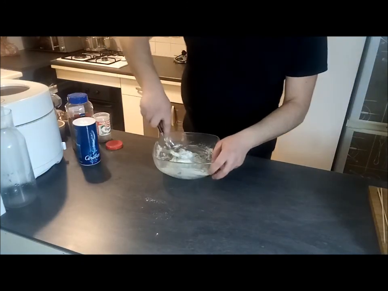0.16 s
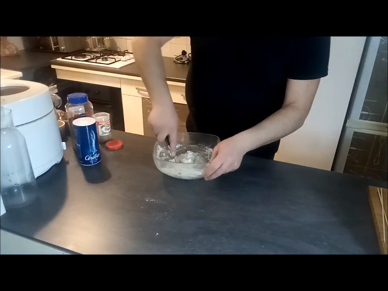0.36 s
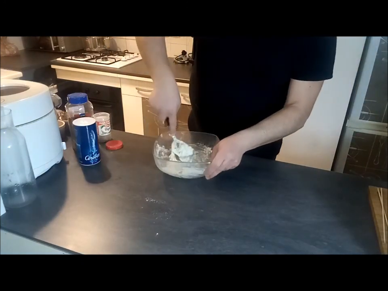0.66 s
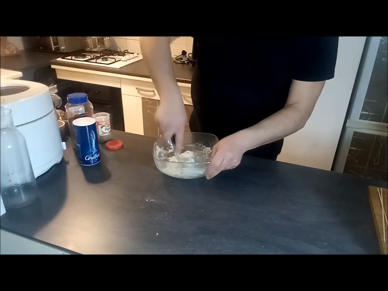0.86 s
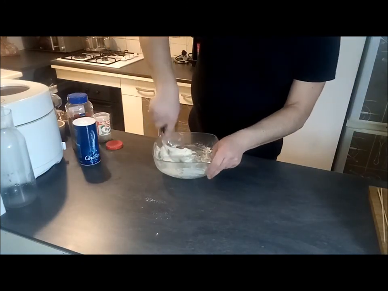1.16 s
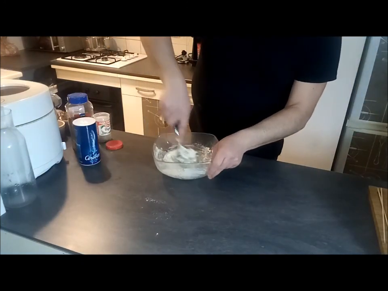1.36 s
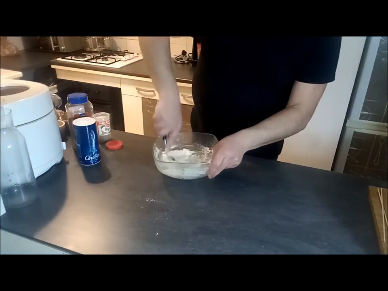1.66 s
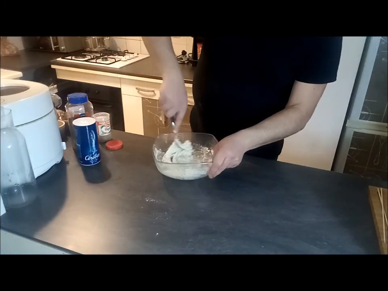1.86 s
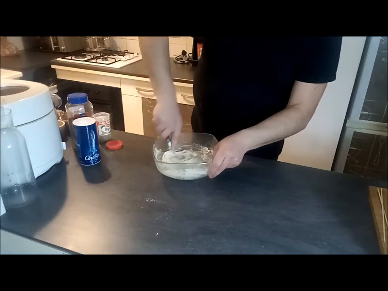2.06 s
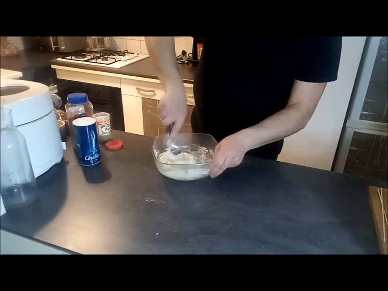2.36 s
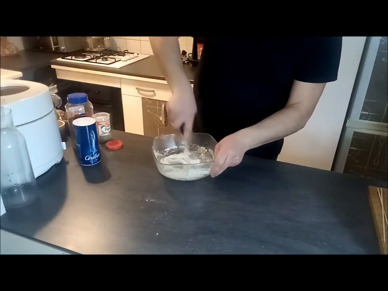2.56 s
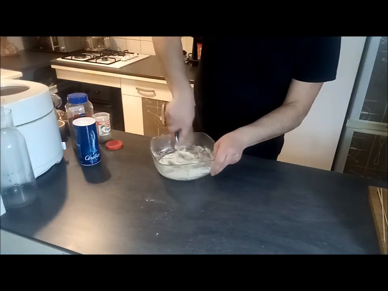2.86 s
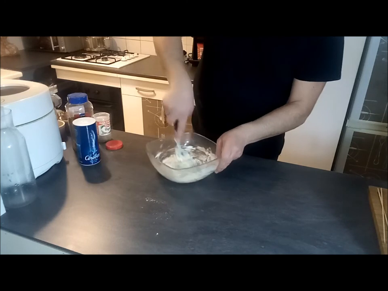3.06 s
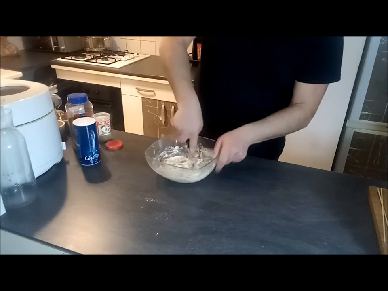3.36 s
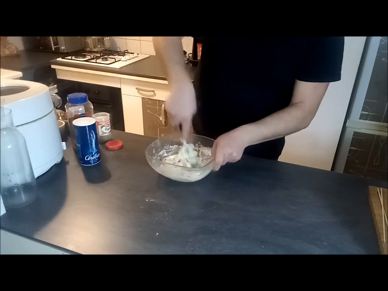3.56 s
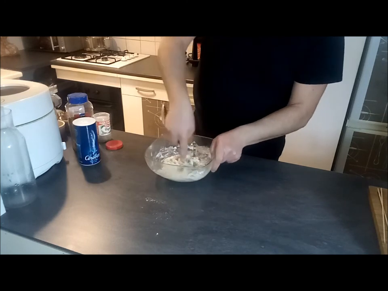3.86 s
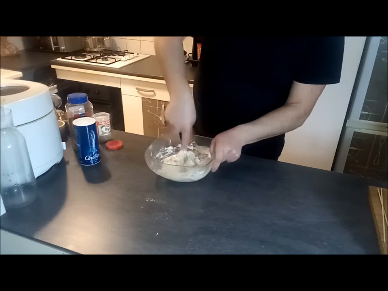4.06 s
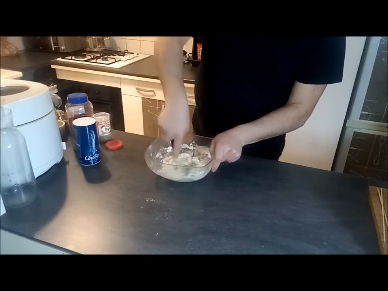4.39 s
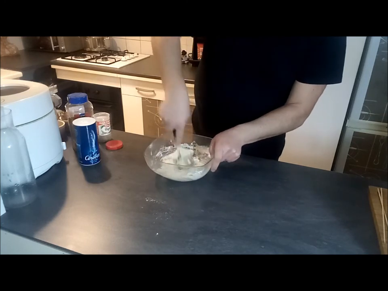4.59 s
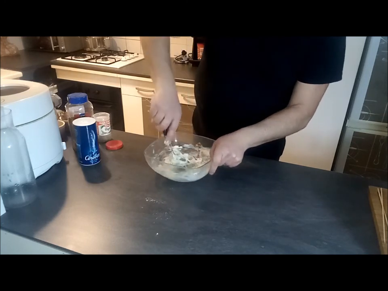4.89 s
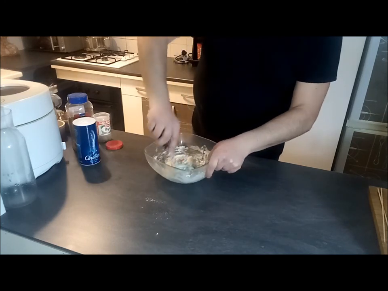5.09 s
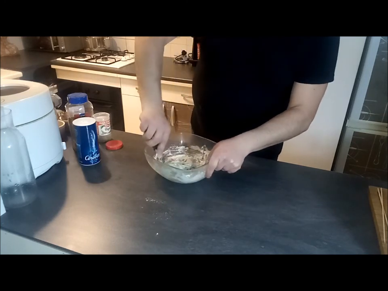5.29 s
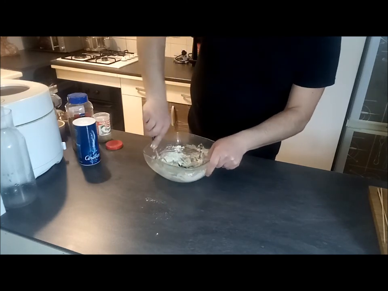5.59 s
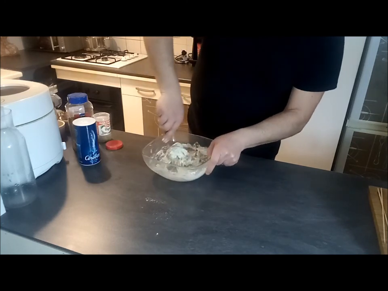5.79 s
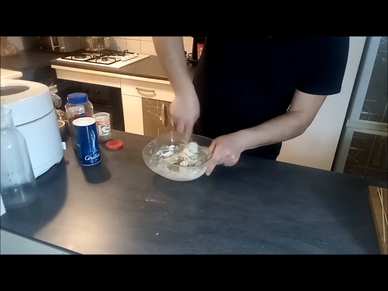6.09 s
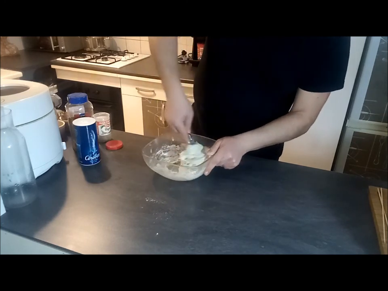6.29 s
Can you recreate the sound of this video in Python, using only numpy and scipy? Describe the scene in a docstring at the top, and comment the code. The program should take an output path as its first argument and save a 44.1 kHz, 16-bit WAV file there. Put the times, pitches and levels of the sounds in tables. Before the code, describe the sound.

A spoon scrapes through stiff dough in a glass bowl in short uneven strokes, while the bowl knocks sharply on a hard kitchen counter.

```python
"""A spoon is heard scraping along a glass bowl as it works stiff dough, over the faint air of a kitchen.
Friction noise is shaped by bowl and counter resonances; the bowl knocks on the counter, the spoon on the rim.
Each knock is a filtered click with chatter, ringing modes and decaying noise tails. A whistle, a hollow sliding
tone and a singing rim join the scrape. Hard walls answer; the bowl is nearer the left microphone.
"""
import sys
import numpy as np
from scipy import signal
from scipy.fft import rfft, irfft, next_fast_len
from scipy.io import wavfile
from scipy.ndimage import uniform_filter1d, map_coordinates

SR = 44100
rng = np.random.default_rng(int(sys.argv[2]) if len(sys.argv) > 2 else 0)


def pcm_store(signal):
    """Save signal as 16-bit PCM."""
    levels = np.round(np.clip(np.atleast_2d(signal), -1, 1) * 32767)
    wavfile.write(sys.argv[1], SR, levels.astype(np.int16).T)


N = 284004

# Quiet kitchen air, spectrum: (frequency [Hz], relative level [dB])
AIR_SPECTRUM = [(15, -72), (30, -44.5), (100, -5), (160, -0.5), (300, -8.5), (700, -11.5), (2000, -18.5),
                (3500, -28), (5500, -16.5), (7800, -20.5), (9000, -38.5), (13500, -59), (15200, -32)]
# Spoon and dough rubbing on glass, spectrum: (frequency [Hz], relative level [dB])
SCRAPE_SPECTRUM = [(100, -58.5), (400, -15.5), (620, -12.5), (800, 0.5), (1400, -2.5), (2900, -7),
                   (4500, -10), (6500, -9), (7900, -12.5), (8600, -14), (10500, -26.5), (12500, -36.5),
                   (14000, -39), (15000, -36), (15700, -33.5)]
# Bowl dragging on the counter, spectrum: (frequency [Hz], relative level [dB])
RUMBLE_SPECTRUM = [(24, -51), (40, -39.5), (123, -24.5), (157, -15), (250, 1.5), (394, 1.5), (700, -2),
                   (910, -32), (1540, -120)]
# Spoon strokes: (time at full force [s], swell [s], hold [s], scrape before mixing [dB],
# dullness [dB per octave], glass ring re scrape [dB], counter rumble re scrape [dB])
SPOON_STROKES = [(0, .05, 0.013, -44, 0, -10, -14), (.24, 0.7, .14, -69, 0, -15, -9),
                 (0.443, 0.029, 0.0061, -56, 1.5, -1, -10), (0.623, 0.059, 0.015, -49, -3.5, -23, 2),
                 (1.019, 0.058, 0.016, -61, -4.5, -20, -17), (1.108, 0.1, 0.032, -58, 2.5, -1, -9.5),
                 (1.38, 0.71, 0.037, -75, 1.5, 3, -5), (1.591, 0.047, 0.013, -54.5, 1.5, -4, -10),
                 (2.152, 0.044, 0.0076, -48, 0, -6, -18), (2.382, 0.19, 0.0056, -63, -2.5, -7, -8),
                 (2.705, 0.032, 0.028, -49, 0.5, -4.5, -19), (2.88, 0.11, .04, -68.5, 9, -13, -2),
                 (2.975, 0.066, 0.065, -50, -7, 3, -7), (3.092, 0.19, 0.033, -42.5, -2.5, -5.5, -12.5),
                 (3.225, 0.24, 0.0084, -56, 2, -3.5, -15), (3.354, .04, 0.063, -58, 1, -0.5, -10),
                 (3.58, 0.081, 0.0096, -46, 2, -20, -11), (3.985, 0.045, 0.03, -73, 3, -6, -3.5),
                 (4.462, 0.012, 0.019, -49.5, 1.5, -6, -25), (4.729, 0.074, 0.032, -56.5, 2.5, 5.5, -14),
                 (4.817, 0.15, 0.089, -46.5, 0.5, -5, -19), (5.33, 0.06, 0.041, -55, 1.5, -1, -20),
                 (5.458, 0.056, 0.024, -48, -6, 8.5, -14), (5.575, 0.24, 0.15, -52.5, 1, -4, -23),
                 (6.005, 0.094, 0.03, -55, -3, -4.5, -29), (6.124, 0.22, 0.098, -63.5, 3.5, -1, -15),
                 (6.327, 0.39, 0.081, -71.5, -5.5, -0.5, -26)]
# Bowl resonances: (frequency [Hz], width [Hz], relative level [dB])
GLASS_MODES = [(785, 130, 1), (1167, 14, -10.5), (1340, 130, 1), (1920, 79, 0), (2396, 63, 4.5),
               (2844, 160, 5), (2840, 120, -11), (3560, 120, -1), (3960, 180, -1), (4864, 98, 1.5),
               (5360, 100, -11.5), (5630, 78, 1), (6550, 35, -12.5), (7010, 25, -22)]
# Impact spectrum before each knock's own colour: (frequency [Hz], relative level [dB])
BLOW_SPECTRUM = [(20, -64.5), (45, -32.5), (70, -3.5), (150, -7), (250, 4.5), (500, 2), (900, 3),
                 (1800, -4.5), (3000, -17), (7000, -32), (9000, -44), (15000, -79)]
# Bowl's foot on the counter: (time [s], crack peak [dB], brightness [dB per octave], bite [dB], thud [dB],
# room re crack [dB], tail t60 before decay shares [s], snap re crack [dB], boom [Hz], boom re crack [dB])
FOOT_KNOCKS = [(0.269, -41.5, -20, -13, 11, 5.5, 0.22, -40, 110, -12),
               (.335, -53, -23, -4, 13.5, 5.5, 0.18, -40, 110, -12),
               (0.588, -37, -10, 8, -9, 7, 0.3, -42, 226, -17),
               (0.599, -13, -0.85, 0, -6.5, 4, 0.6, -9.5, 226, -17),
               (1.66, -55, -21, -3, -9, 4.5, 0.49, -40, 226, -23),
               (2.3399, -12.5, -2.5, -2, 1, -0.36, 0.47, -25.5, 222, -14),
               (2.9585, -20.5, -0.5, -8, -7.5, -0.5, 0.61, -11, 242, -19),
               (2.9616, -15.5, 0, -6.5, -7, -1, 0.69, -24, 242, -23.5),
               (2.9651, -11, -0.5, -5.5, -0.1, 3, 0.58, -20, 242, -19.5),
               (2.9702, -15, -1, -6, 0.2, 0.5, 0.55, -30, 242, -18),
               (3.533, -8.5, -0.3, 6.5, 4.5, 1.5, 0.68, -6, 222, -19.5),
               (4.528, -62, -22, 1, 4, 8, 0.21, -40, 150, -11)]
# Spoon on the rim: the same columns as the foot knocks
RIM_TAPS = [(1.599, -32, 12.3, -20, -6, -1, 0.49, -30, 226, -42),
            (5.4305, -11.5, 7.7, 0.5, 11, -4, 0.58, -14, 227.4, -28.5),
            (6.003, -38, 14, -3, -16, -2, .3, -30, 226, -40),
            (6.056, -42, 3.4, -4, -3, 3.5, 0.67, -30, 225, -40)]
# Free modes of the rim: (frequency [Hz], relative level [dB])
RIM_MODES = [(710, -7), (1200, -4), (1620, 0), (2040, -2), (2606, -4), (3074, -9), (3531, -1), (3784, -10),
             (4775, -5), (5604, -1), (5814, -6), (6245, -2), (7430, -10)]
# Counter and cupboard resonances: (frequency [Hz], width [Hz], relative level [dB])
COUNTER_MODES = [(157.6, 12, -8), (223, 15, -4.5), (244, 11, -5.5), (292, 12, -0.5), (371.4, 15, -1),
                 (532, 16, -7), (558.8, 11, -5), (649.5, 7.2, -1), (768, 20, -8.5), (804, 18, -7),
                 (850, 20, -8), (902, 16, -5), (992, 20, -12.5), (1064, 20, -7), (1178, 30, -8.5),
                 (1310, 27, -8), (1567, 20, -11.5)]
# Decay time across the spectrum: (frequency [Hz], share of the tail's t60 [ratio])
DECAY_SHARE = [(100, 0.6), (500, 0.76), (2000, 0.81), (5000, 0.77), (10000, 0.62)]
# Spoon's whistle on wet glass: (frequency [Hz], width [Hz], relative level [dB])
WHISTLE_MODES = [(3060, 320, -8), (4600, 1500, -19), (5540, 400, -8), (7200, 100, -15)]
# Whistle envelope: (time [s], level [dB])
WHISTLE_LEVEL = [(.93, -104), (1.0, -66), (1.15, -58), (1.28, -69), (1.36, -60.5), (1.48, -63), (1.58, -71),
                 (1.7, -99), (4.265, -100), (4.285, -77), (4.31, -82), (4.37, -95)]
# Low hollow tone as the dough folds: (time [s], centre frequency [Hz], level [dB])
FOLDING_GLIDE = [(5.5, 300, -74), (5.62, 410, -62.5), (5.75, 448, -62), (5.83, 281, -64), (5.89, 151, -72),
                 (5.972, 150, -93), (6.1, 185, -67), (6.17, 290, -66), (6.25, 450, -69), (6.36, 560, -97)]
# Envelope of the rubbed, singing rim: (time [s], level [dB])
SINGING_LEVEL = [(6.15, -100), (6.25, -66), (6.32, -63), (6.39, -58.5), (6.44, -73.5)]
# Left channel over right: (frequency [Hz], level difference [dB])
LEFT_OVER_RIGHT = [(60, 4.5), (110, 6.5), (200, 5.5), (380, 7), (700, 10), (1290, 9.5), (2380, 10.5),
                   (4400, 8.5), (8120, 1.5), (15000, -4)]
# Overall treble, a step down above 8 kHz: (frequency [Hz], gain [dB])
TREBLE_RESPONSE = [(8000, -1), (8500, -8.5), (12000, -15.5), (14500, -11), (15600, -7)]

AIR_DB = -74
SWELL_DB, SWELL_SHAPE = 20, 1.26  # rise over the swell time; exponent of its dB curve
STROKE_FADE, RUMBLE_FADE = 138, 105  # dB per s after the hold
RESTING_DB = -88  # scrape while the spoon barely moves, before mixing
DULLS_PER_S, DULLEST = 17, 1.6  # fading treble: dB per octave each second, and its limit in dB per octave
RUMBLE_LAG_S = 0.019  # the bowl follows the spoon late
KNOCK_SAMPLES = 24576
# counter ring [dB], rim ring re crack [dB], rim t60 [s], contact [s]
FOOT_CONTACT = (-0.14, -58, 0.6, 0.0032)
RIM_CONTACT = (-12.5, -29, 0.26, 0.0045)
LAG_S, TOP_HZ = 41 / 44100, 15600  # right channel's delay; upper band limit


def amp(db):
    """Level law: 20 dB is a factor of ten in amplitude."""
    return 10 ** (np.asarray(db) / 20)


def unit(x):
    """Normalization to unit root-mean-square."""
    return x / np.sqrt(np.mean(x ** 2) + 1e-20)


def along(points, hz):
    """Interpolation of (frequency, value) points on a logarithmic frequency axis."""
    f, v = np.transpose(points)
    return np.interp(np.log(hz + 1), np.log(f + 1), v)


def wobble(rate):
    """Band-limited fluctuation: a smooth random curve with rate knots a second."""
    knots = rng.standard_normal(int(N * rate / SR) + 4)
    return map_coordinates(knots, [np.arange(N) * rate / SR])


def filtered(x, response):
    """Linear filtering: the spectrum times a complex response of frequency."""
    m = next_fast_len(x.shape[-1] + 8192)  # zero padding leaves room for ringing
    return irfft(rfft(x, m) * response(np.fft.rfftfreq(m, 1 / SR)), m)[..., :x.shape[-1]]


def resonances(modes):
    """Modal superposition: second-order resonators of alternating sign form a body's response."""
    def response(f):
        total = 0
        for k, (centre, width, db) in enumerate(modes):
            mode = 1j * f * width / (centre * centre - f * f + 1j * f * width)
            total = total + (-1) ** k * amp(db) * mode
        return total
    return response


def streaked(x, depth_db):
    """Spectral fluctuation: narrow bands swell and fade on their own."""
    z = signal.stft(x, SR, nperseg=1024)[2]
    field = uniform_filter1d(rng.standard_normal(z.shape[-2:]), size=2, axis=0)  # across frequency
    field = uniform_filter1d(field, size=9, axis=1)  # across time
    gain = amp(depth_db * unit(field))
    return signal.istft(z * unit(gain), SR, nperseg=1024)[1][..., :N]


def kitchen():
    """Stationary noise, slightly modulated: the faint air of the room."""
    noise = rng.standard_normal((2, N)) * amp(0.94 * wobble(2.3))
    air = filtered(noise, lambda f: amp(along(AIR_SPECTRUM, f)))
    return amp(AIR_DB) * streaked(unit(air), depth_db=2.0)


def strokes():
    """Incoherent summation: strokes swell, hold and fade; overlapping powers add and colours blend."""
    t = np.arange(0, N / SR, 0.002)
    s, swell, hold, db, dull, ring_db, rumble_db = np.transpose(SPOON_STROKES)[..., None]
    before = np.maximum(s - t, 0)
    after = np.maximum(t - s - hold, 0)
    rising_db = db - SWELL_DB * (before / swell) ** SWELL_SHAPE
    scrape = amp(rising_db - STROKE_FADE * after)

    def total(parts, rest_db):
        return np.sqrt((parts ** 2).sum(0) + amp(rest_db) ** 2)

    hiss = total(scrape, RESTING_DB)
    dull = dull + np.minimum(DULLS_PER_S * after, DULLEST)  # a fading stroke loses treble
    dull = (dull * scrape ** 2).sum(0) / hiss ** 2
    ring = total(scrape * amp(ring_db), RESTING_DB - 5)
    drag = total(amp(rising_db + rumble_db - RUMBLE_FADE * after), RESTING_DB - 1)
    drag = np.interp(t - RUMBLE_LAG_S, t, drag)
    return [np.interp(np.arange(N) / SR, t, curve) for curve in (hiss, dull, ring, drag)]


def grit(response):
    """Stick-slip friction: noise whose level fluctuates with catches and slips, then filtered."""
    uneven = amp(1.4 * wobble(70) + 2.6 * wobble(400))
    return unit(filtered(rng.standard_normal(N) * uneven, response))


def scrape_hiss(dull):
    """Spectral tilt about 5 kHz: friction noise grows duller or brighter with each stroke."""
    noise = grit(lambda f: amp(along(SCRAPE_SPECTRUM, f)))
    hz, t, z = signal.stft(noise, SR, nperseg=512)
    octaves = np.log2(np.clip(hz, 500, 12000)[:, None] / 5000)
    slope_db = np.interp(t, np.arange(N) / SR, dull) * octaves
    return signal.istft(z * amp(-slope_db), SR, nperseg=512)[1][:N]


def diffuse(x, t60):
    """Diffuse-field reverberation: power lingers in each band and returns as fresh noise."""
    hz, t, z = signal.stft(x, SR, nperseg=512)
    keep = amp(-120 * t[1] / t60)  # power kept per frame
    power = signal.lfilter([0, 1 - keep], [1, -keep], np.abs(z) ** 2)
    noise = signal.stft(rng.standard_normal((2, N)), SR, nperseg=512)[2]
    noise = noise / np.sqrt(np.mean(np.abs(noise) ** 2))
    return signal.istft(noise * np.sqrt(np.abs(power)), SR, nperseg=512)[1][:, :N]


def pair(direct, tails):
    """Interchannel delay and coherence: the right lags; room bass is common to both, treble is not."""
    shared = filtered(tails, lambda f: [1 / np.sqrt(1 + (f / 500) ** 2),
                                        1 / np.sqrt(1 + (500 / (f + 1)) ** 2)]).sum(0)
    both = direct + np.array([tails[0], shared])
    return filtered(both, lambda f: np.exp(-2j * np.pi * f * np.array([[0], [LAG_S]])))


def scraping():
    """Friction excitation: steel and dough rub on glass, bowl and spoon ring, the bowl drags."""
    scrape, dull, ring, drag = strokes()
    hiss = scrape * scrape_hiss(dull)
    glass = ring * grit(resonances(GLASS_MODES))
    rumble = drag * grit(lambda f: amp(along(RUMBLE_SPECTRUM, f)))
    rub = amp(1.5) * (hiss + glass + rumble) + whistle() + folding()
    room = amp(4.5) * diffuse(rub, t60=0.17)
    return streaked(pair(rub, room), depth_db=2.2) + pair(singing(), np.zeros((2, N)))


def causal(gain_db):
    """Minimum phase by the folded cepstrum: an impulse response of energy 1 from a dB gain."""
    gain = np.maximum(gain_db(np.fft.rfftfreq(4096, 1 / SR)), -140)
    cepstrum = irfft(np.log(amp(gain)))
    cepstrum = cepstrum * np.r_[1, np.full(2047, 2), 1, np.zeros(2047)]
    h = irfft(np.exp(rfft(cepstrum)))
    return h / np.linalg.norm(h)


def impact_colour(bright, bite_db, thud_db):
    """Contact stiffness: harder contacts wake the upper mids; tilt and bass thud vary too."""
    def gain_db(f):
        bite = bite_db * np.exp(-np.log2((f + 1) / 2100) ** 2 / 0.76)
        tilt = bright * np.log2(np.clip(f, 200, 8000) / 1000)
        thud = thud_db * np.clip(np.log2(200 / (f + 1)), 0, 1)
        return along(BLOW_SPECTRUM, f) + bite + tilt + thud
    return causal(gain_db)


def impact_crack(blow, contact, t):
    """Repeated impact: a click and the chatter of surfaces bouncing until they part, peak 1."""
    chatter = rng.standard_normal(2048) * np.exp(-(t[:2048] / contact) ** 3)
    crack = signal.fftconvolve(np.r_[4.5, chatter[1:]], blow)
    crack = filtered(crack, lambda f: 1j * f / (1j * f + 350))  # a small bowl radiates little bass
    return crack / np.abs(crack).max()


def first_snap(t):
    """Brief hard contact: a decaying, low-passed noise burst at first touch."""
    snap = rng.standard_normal(64) * np.exp(-t[:64] / 0.00038)
    return filtered(snap, lambda f: 1 / (1 + 1j * f / 5500) ** 4)


def counter_boom(hz, t60, t):
    """Damped single-mode vibration: a low tone that depends on where the foot lands."""
    decay = amp(-60 * t / (0.5 * t60))
    return decay * np.sin(2 * np.pi * hz * t) * (1 - np.exp(-t / 0.006))


def rim_ring(t60, t):
    """Free modal vibration: the rim's modes are struck unequally and decay together."""
    return sum(amp(g + rng.normal(0, 2.5) - 60 * t / t60) * np.sin(2 * np.pi * hz * t)
               for hz, g in RIM_MODES)


def counter_hum(t60, t):
    """Modal afterglow: the counter's modes build up and keep sounding."""
    modes = sum(amp(g + rng.normal(0, 2.5)) * np.sin(2 * np.pi * hz * t)
                for hz, width, g in COUNTER_MODES)
    decay = amp(-22 - 60 * (t / (0.74 * t60)) ** 1.09)
    return decay * modes * (1 - np.exp(-t / 0.014))


def tail(t60, rise):
    """Two decaying noise tails, shorter in bass and top treble, with a fade that steepens."""
    hz, t, z = signal.stft(rng.standard_normal((2, KNOCK_SAMPLES)), SR, nperseg=256)
    decay_s = t60 * along(DECAY_SHARE, hz)[:, None]
    fade = amp(-60 * (t / decay_s) ** 1.205) * (1 - np.exp(-t / rise))
    tails = signal.istft(z * fade, SR, nperseg=256)[1]
    return tails / np.linalg.norm(tails[0])


def room_echo(blow, t60, counter_db):
    """Convolution with the room: the bass lives mostly in the counter and cupboard modes."""
    echo = signal.fftconvolve(blow[None], tail(t60, rise=0.0058), axes=1)[:, :KNOCK_SAMPLES]
    leaner = filtered(echo, lambda f: 1 - 0.3 / (1 + 1j * f / 450))
    return leaner + amp(counter_db + 6.5) * filtered(echo, resonances(COUNTER_MODES))


def knocks():
    """Impact excitation: a chattering click rings rim and counter and fills the room."""
    direct, room = np.zeros(N + KNOCK_SAMPLES), np.zeros((2, N + KNOCK_SAMPLES))
    t = np.arange(KNOCK_SAMPLES) / SR
    contacts = [tuple(row) + FOOT_CONTACT for row in FOOT_KNOCKS]
    contacts += [tuple(row) + RIM_CONTACT for row in RIM_TAPS]
    for (s, db, bright, bite_db, thud_db, room_db, t60, snap_db, boom_hz, boom_db,
         counter_db, rim_db, rim_t60, contact) in contacts:
        blow = impact_colour(bright, bite_db, thud_db)
        crack = amp(db) * impact_crack(blow, contact, t)
        snap = amp(db + snap_db) * first_snap(t)
        at = round(s * SR)
        span = slice(at, at + KNOCK_SAMPLES)
        direct[at:at + len(crack)] += crack
        direct[at:at + len(snap)] += snap
        direct[span] += amp(db + boom_db) * counter_boom(boom_hz, t60, t)
        direct[span] += amp(db + rim_db) * rim_ring(rim_t60, t)
        direct[span] += amp(db + counter_db) * counter_hum(t60, t)
        echo = room_echo(blow, t60, counter_db)
        room[:, span] += np.linalg.norm(crack) * amp(room_db) * echo
    return pair(direct[:N], room[:, :N])


def whistle():
    """Resonant friction: noise through narrow bands, the spoon whistling on wet glass."""
    level = amp(np.interp(np.arange(N) / SR, *np.transpose(WHISTLE_LEVEL)))
    return level * grit(resonances(WHISTLE_MODES))


def folding():
    """Moving resonance: noise in one sliding band gives a hollow tone as the dough folds."""
    hz, t, z = signal.stft(rng.standard_normal(N), SR, nperseg=1024)
    s, centre_hz, db = np.transpose(FOLDING_GLIDE)
    centre = np.interp(t, s, centre_hz)
    band = np.exp(-(np.log((hz[:, None] + 1) / centre) / 0.25) ** 2)
    hollow = unit(signal.istft(z * band, SR, nperseg=1024)[1][:N])
    return amp(np.interp(np.arange(N) / SR, s, db, left=-140, right=-140)) * hollow


def singing():
    """Sustained modal vibration: the rubbed rim sings with wavering level and phase."""
    now = np.arange(N) / SR
    modes = sum(amp(g + 1.8 * wobble(23)) * np.sin(2 * np.pi * hz * now + 0.65 * wobble(35))
                for hz, g in RIM_MODES)
    return amp(np.interp(now, *np.transpose(SINGING_LEVEL))) * unit(modes)


def scene():
    """Superposition of room air, friction and impacts."""
    return kitchen() + scraping() + knocks()


def record(dry):
    """Overall treble: a step down above 8 kHz, nothing above 15.6 kHz; left and right differ in balance."""
    def response(f):
        balance_db = np.array([[0.3], [-0.7]]) * along(LEFT_OVER_RIGHT, f)
        return amp(along(TREBLE_RESPONSE, f) + balance_db) * (f < TOP_HZ)
    return filtered(dry, response)


dry = scene()
out = record(dry)
pcm_store(out)
```